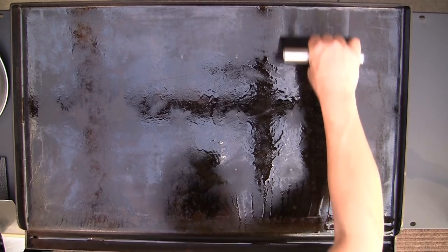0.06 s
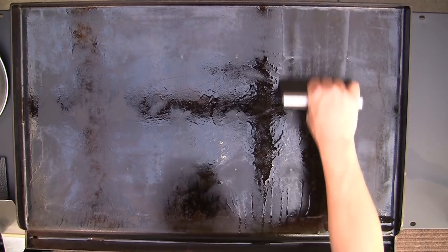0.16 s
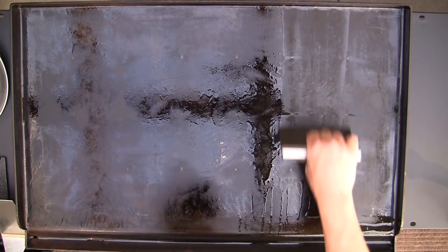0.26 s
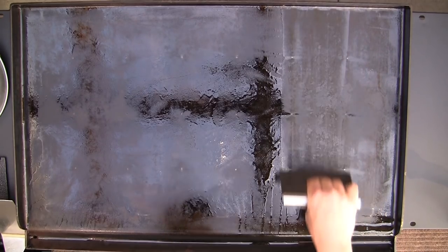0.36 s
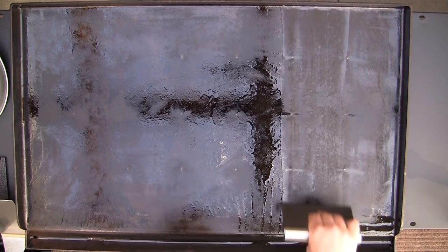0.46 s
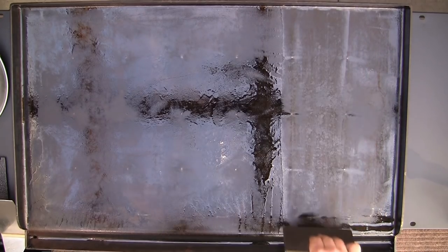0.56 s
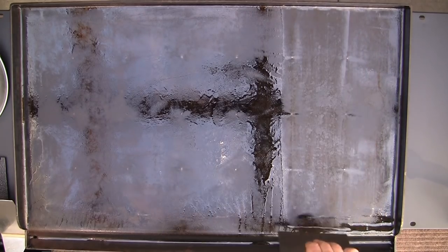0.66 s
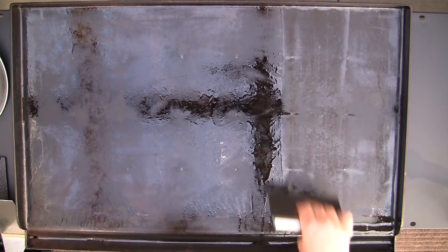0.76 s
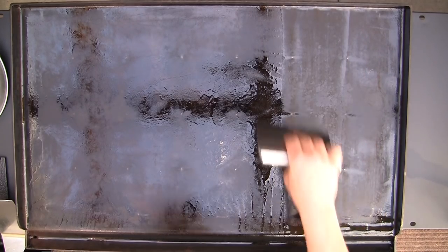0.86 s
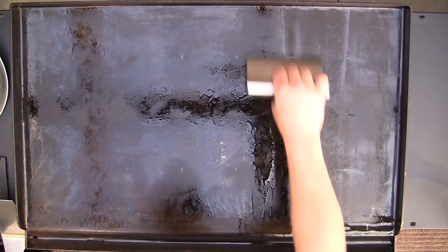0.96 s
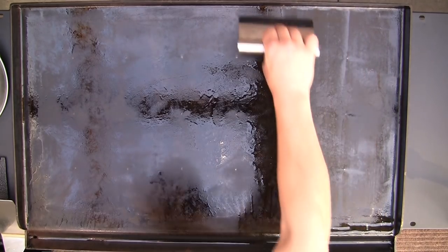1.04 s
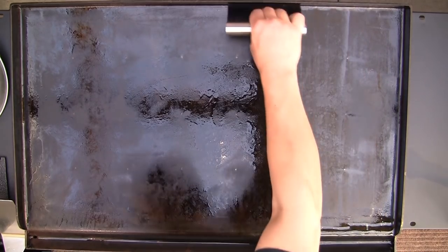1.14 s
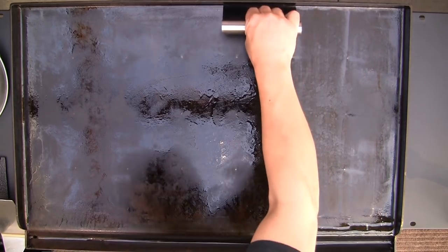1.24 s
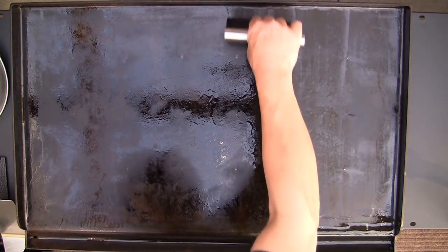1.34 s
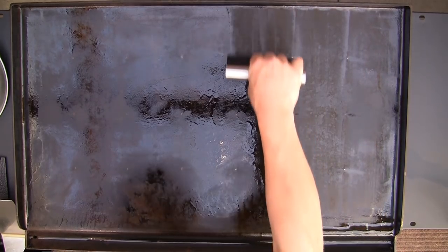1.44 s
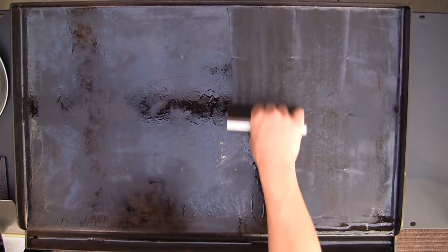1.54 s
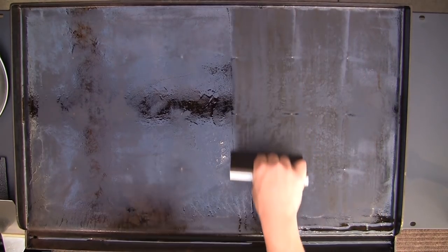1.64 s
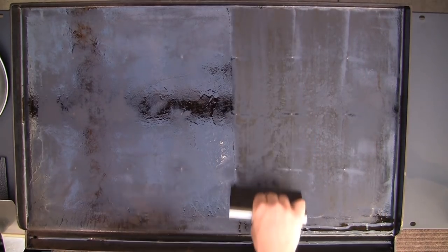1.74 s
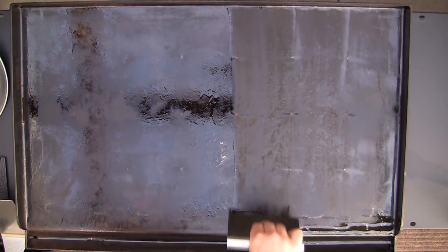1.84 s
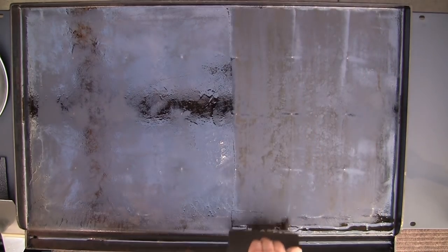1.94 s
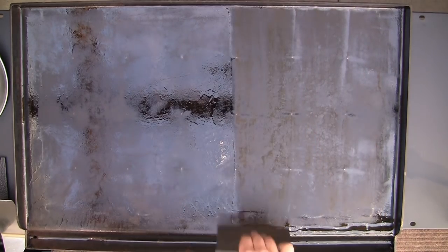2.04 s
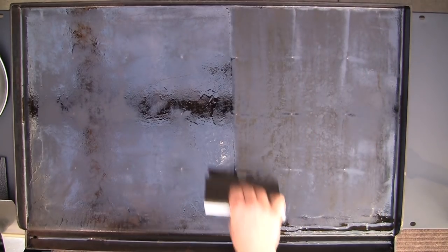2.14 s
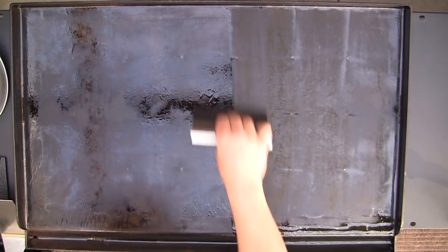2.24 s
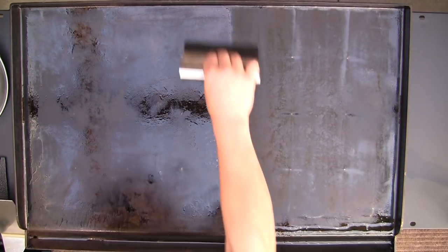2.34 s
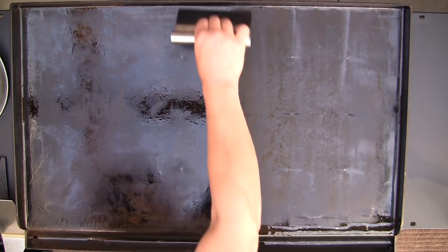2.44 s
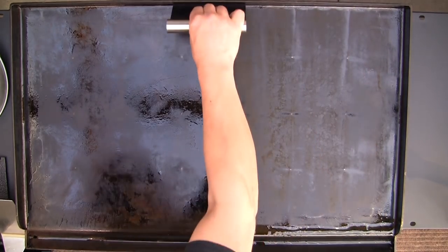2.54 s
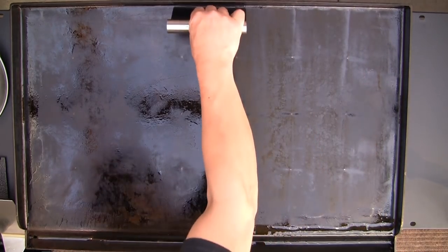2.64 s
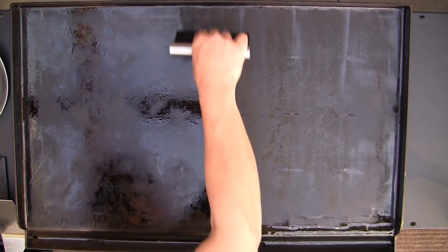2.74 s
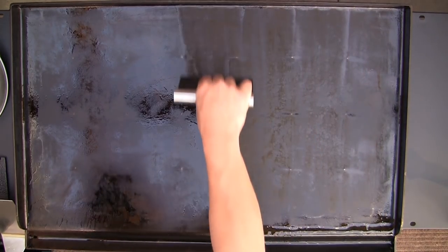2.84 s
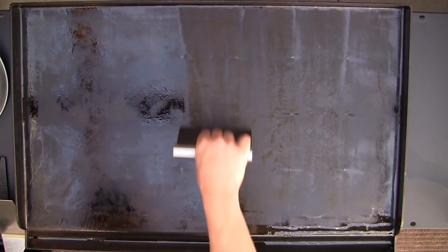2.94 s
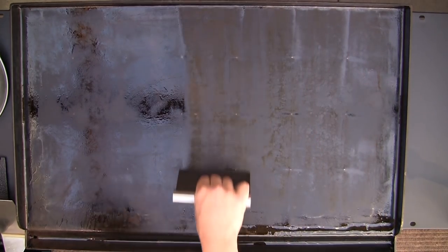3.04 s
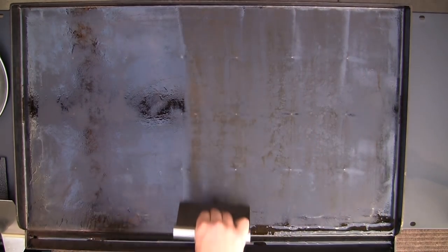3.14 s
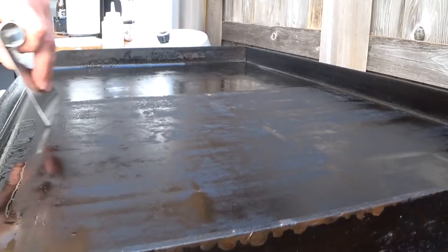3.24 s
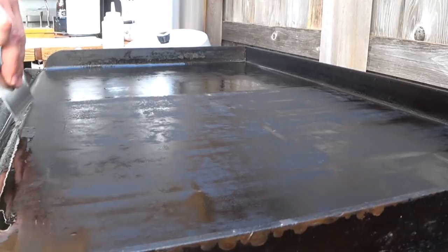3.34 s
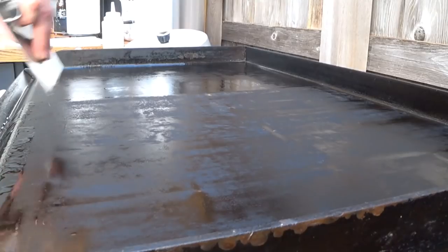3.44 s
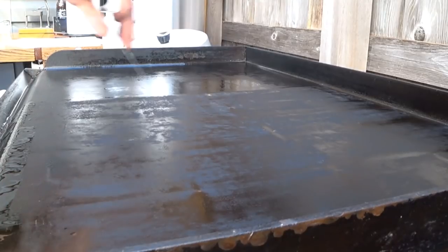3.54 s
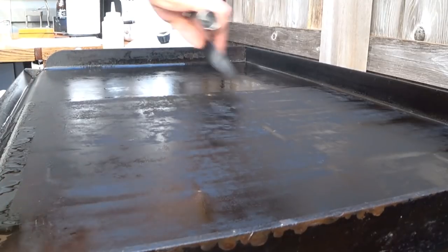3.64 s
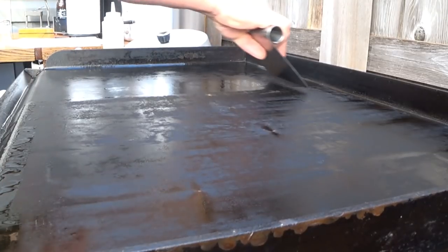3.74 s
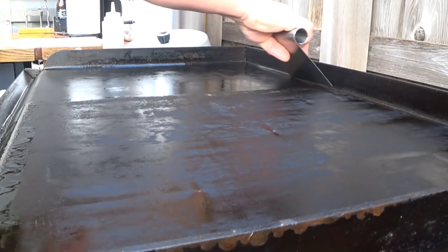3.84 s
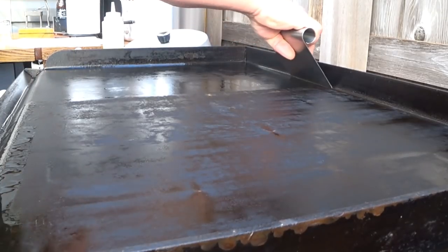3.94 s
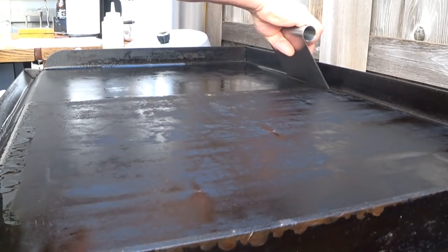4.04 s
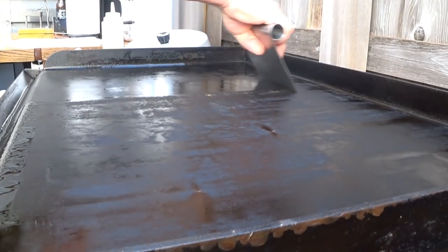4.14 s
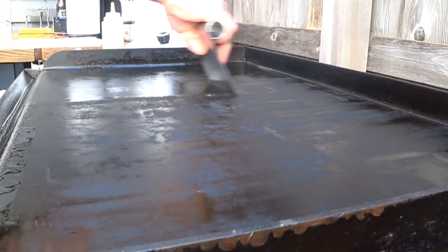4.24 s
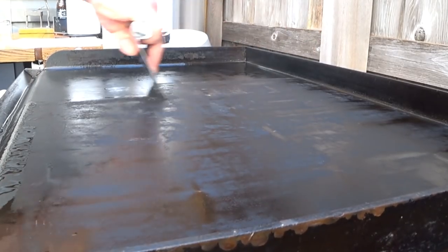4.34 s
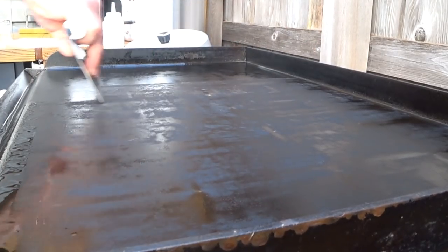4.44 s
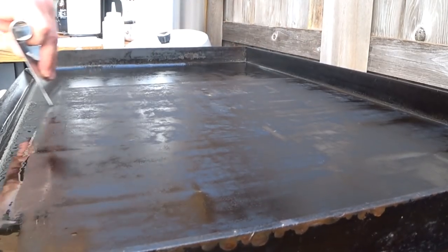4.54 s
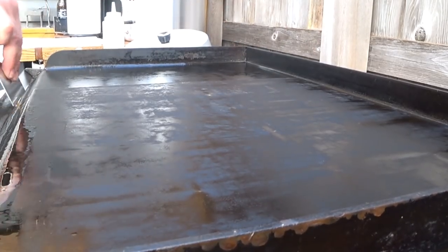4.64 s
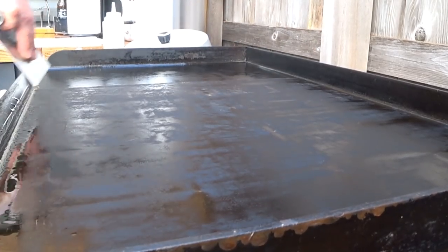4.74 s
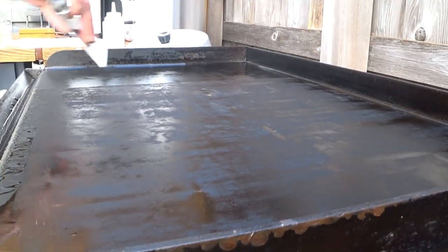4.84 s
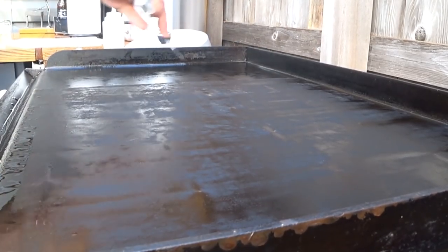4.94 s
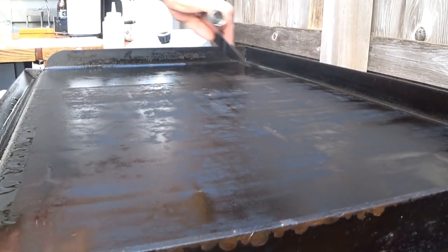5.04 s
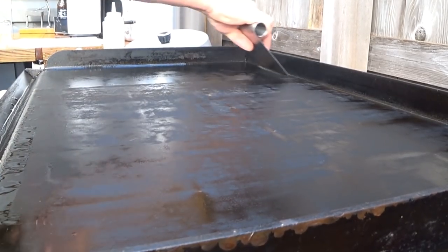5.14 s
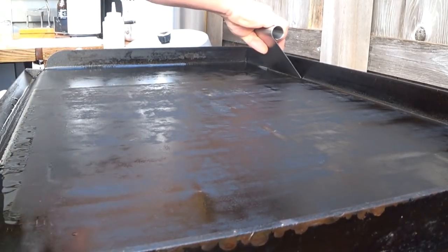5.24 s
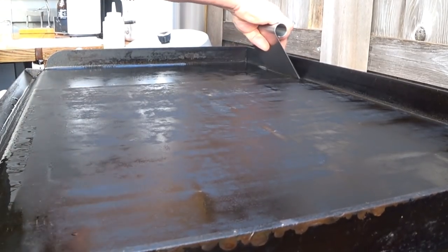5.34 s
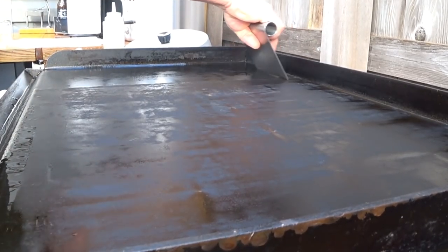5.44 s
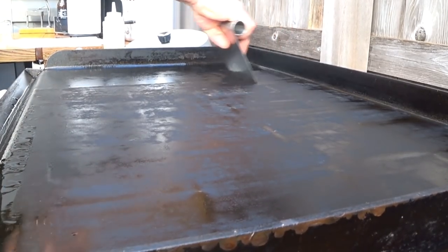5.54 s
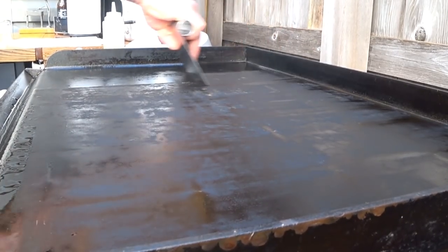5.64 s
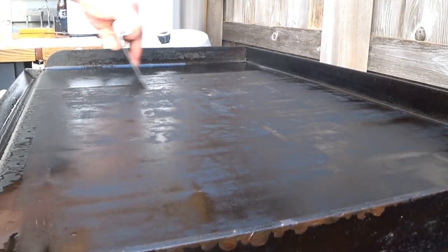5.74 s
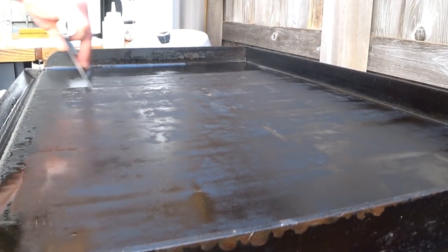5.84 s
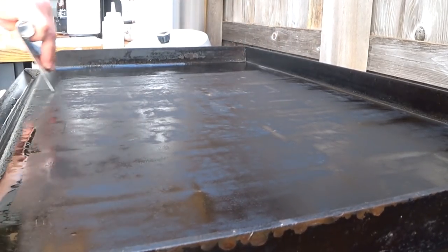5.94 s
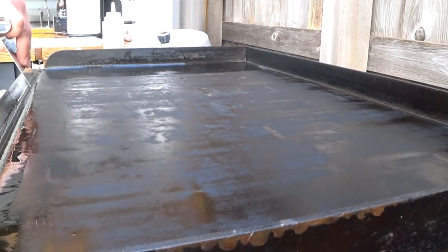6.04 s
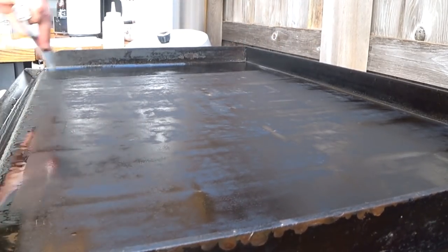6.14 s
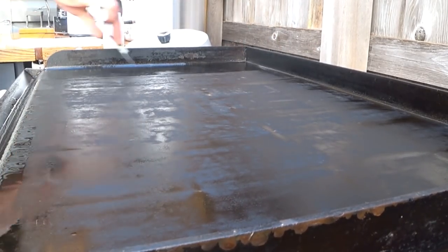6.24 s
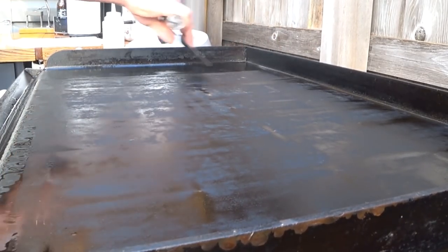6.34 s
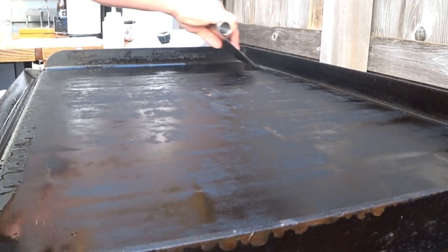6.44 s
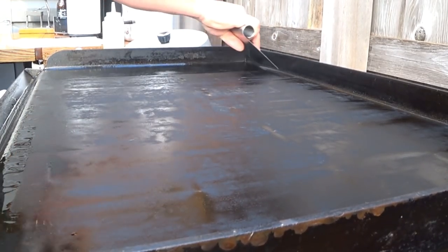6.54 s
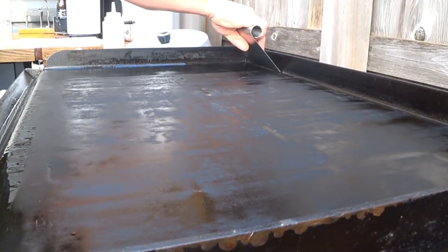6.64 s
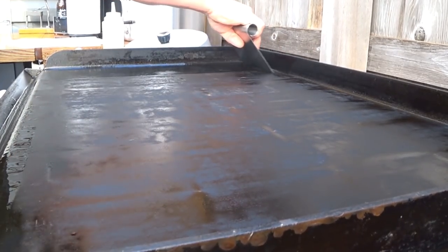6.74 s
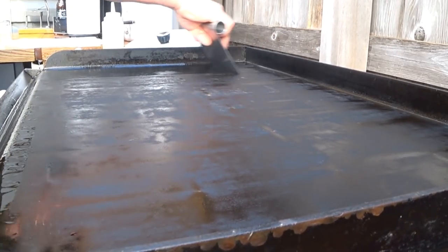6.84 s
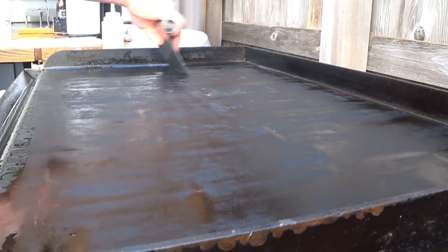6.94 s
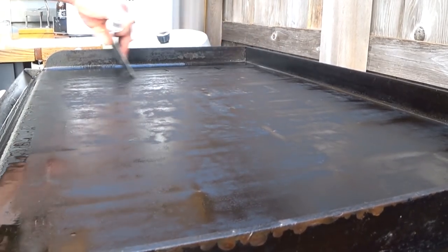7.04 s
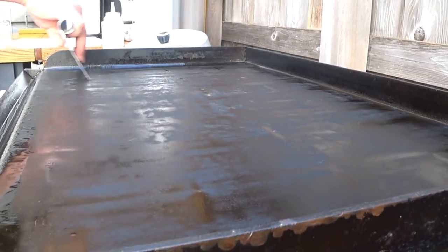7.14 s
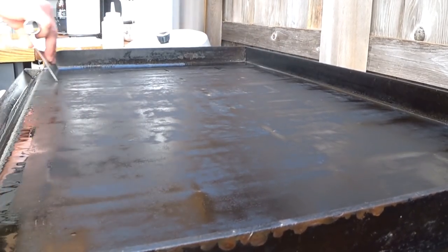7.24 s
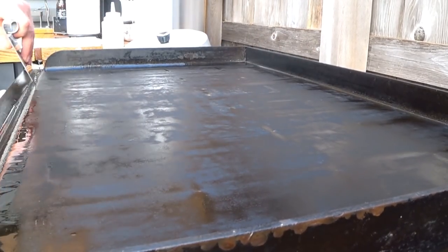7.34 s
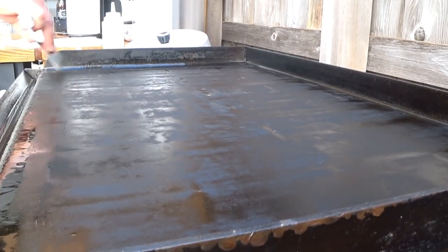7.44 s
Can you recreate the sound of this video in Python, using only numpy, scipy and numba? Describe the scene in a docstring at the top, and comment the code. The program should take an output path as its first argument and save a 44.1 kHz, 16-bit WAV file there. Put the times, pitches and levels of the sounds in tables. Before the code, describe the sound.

Close up, a metal scraper strikes a flat steel cooktop with hard ringing clanks, then pulls along it in gritty, half-second rasps, roughly one every 1.3 seconds. The loudest hits come early; later strokes are somewhat lighter. Each stroke ends with a scuff or tap, then a short pause filled by faint sizzling hiss. Outdoors, dry, slightly right of centre.

```python
"""At an outdoor cooking cart, a steel scraper lands on a hot flat steel cooktop, bounces, drags and taps the rim.
Noise bursts (blows) and gritty noise (drags) drive a bank of ringing plate modes and the blade's own bright rasp.
A changing position under the blade sets how hard each mode is driven; some single modes also swell up clearly.
Shaped noise gives the soft hiss of fat, burners and air, with a thin tone; sine knocks give a few dull bumps.
A gain control briefly turns down the loud blows."""
import sys
import numpy as np
from numba import njit
from scipy import signal
from scipy.fft import rfft, irfft, next_fast_len
from scipy.io import wavfile
from scipy.ndimage import uniform_filter1d, map_coordinates

SR = 44100
rng = np.random.default_rng(int(sys.argv[2]) if len(sys.argv) > 2 else 0)


def dump(signal):
    """Clip the signal to [-1, 1] and save it as 16-bit WAV at the path in sys.argv[1]."""
    limited = np.clip(np.atleast_2d(signal).T, -1, 1)
    pcm = np.round(limited * 32767).astype(np.int16)
    wavfile.write(sys.argv[1], SR, pcm)


N = 330309  # samples, about 7.5 s

# Steady hiss, its colour: (frequency [Hz], level per Hz [dB])
HISS_COLOUR = [(20, -29), (100, -24), (300, -5.5), (600, -3.5), (1500, 5.5), (3400, -7.5), (6500, -10.5),
               (8600, -22), (11000, -21.5), (16000, -34)]
# Blade hitting steel: (time [s], edge level [dB], level of the weight behind it [dB],
#   centre of its body sound [Hz], grit level of the skid that follows [dB])
BLADE_BLOWS = [(.008, -11.5, -3, 1980, -26.5), (0.227, -31, -13, 2900, -46), (0.639, -27, -29, 1150, -30),
               (0.675, -36, -47, 1230, -71), (1.214, -16.5, -30, 3390, -32), (1.2298, -5.5, -6, 1770, -21),
               (1.266, -12, -28, 3670, -28), (1.2719, -2, 3.5, 3830, -8.5), (1.3652, 0.5, 7.5, 1930, -13.5),
               (1.9624, -5.5, -3, 2740, -13), (2.588, -25.5, -19.5, 2240, -34), (2.61, 8, 14, 2900, 1),
               (2.7345, 1, -2, 3530, -32), (3.33, -24, -52, 2000, -25.5), (3.3697, -20, -30, 1310, -28.5),
               (3.918, -45, -32, 1500, -39.5), (3.938, -26, -15.5, 1220, -34),
               (3.9679, -3.5, -4.5, 1270, -34), (4.0726, -17, -12.5, 2590, -64),
               (4.1755, -30, -42, 2050, -58), (4.6326, -23, -24, 2800, -31),
               (4.6818, -9.5, -13.5, 2130, -16.5), (5.2994, -6, -7, 1370, -35),
               (5.3295, -4.5, -3, 2800, -26), (5.425, -7, -7, 3240, -30), (6.02, -38, -45, 2000, -42),
               (6.0828, -22, -22, 2570, -26), (6.6475, -29.5, -19.5, 1500, -38),
               (6.6678, -1, 0.5, 2390, -9), (6.765, -13.5, -10.5, 800, -59), (7.37, -31, -35, 1810, -26),
               (7.39, -22, -26.5, 3820, -26.5)]
# Pulls of the blade along the plate: (start [s], up to speed [s], slowing [s], stop [s],
#   grit creeping off [dB], grit at speed [dB], grit stalling [dB],
#   coarse judder over grit [dB], edge chatter over grit [dB])
DRAG_STROKES = [(0.106, 0.302, 0.53, 0.65, -49, -14.5, -35.5, -13, -16),
                (1.454, 1.655, 1.84, 1.96, -39, -10, -31, -8, -0.5),
                (2.784, 3.022, 3.23, 3.286, -43.5, -15.5, -43.5, 2, 4),
                (4.168, 4.36, 4.46, 4.696, -38.5, -14.5, -42, -3.5, 2.5),
                (5.477, 5.74, 5.9, 6.07, -47.5, -20, -51, 3, 4),
                (6.797, 6.996, 7.14, 7.37, -40.5, -17, -42, -18, 0.5)]
# Clearest ringing modes: the plate's, with the last two (5850, 6780 Hz) rung by the lifted scraper: (frequency
# [Hz])
CLEAR_MODE_HZ = [285, 525, 775, 806, 834, 933, 980, 1068, 1131, 1206, 1255, 1297, 1410, 1432, 1545, 1748,
                 1807, 1851, 1877, 1938, 1977, 2051, 2160, 2202, 2505, 2720, 2879, 2925, 3060, 3222, 5850,
                 6780]
# How each of those modes rings, in the same order: (level [dB], time to fall 60 dB [s])
CLEAR_MODE_RING = [(-16.5, 0.45), (-11, 0.12), (-21, 1.9), (-3, 0.63), (-16.5, 1.25), (-3, 0.32),
                   (-25, 1.64), (-16, 2.5), (-8, 1.4), (-20, 2.47), (-18, 2.8), (-5.5, 0.76), (-21, .8),
                   (0, 0.54), (-16.5, 1.7), (-8, 1.12), (-10, 1.7), (-9, 1.03), (2, 0.75), (-13.5, 0.99),
                   (-9, 1.23), (1, 0.62), (-12, 1.29), (-3, 0.71), (-7, 0.2), (-15, 0.27), (-6.5, 1.09),
                   (16, 0.25), (10, 0.33), (-11, 0.098), (-12, 0.27), (-14, 0.17)]
# The plate's many other modes: (frequency [Hz], level per Hz [dB])
CROWD_LEVEL = [(71, -87), (120, -37.5), (643, -17.5), (911, -9.5), (988, -2), (1400, 0), (1620, -6.5),
               (1860, 2), (2530, -2.5), (2990, -0.5), (4980, -6), (7200, -7.5), (9400, -18.5),
               (10800, -13.5), (16000, -51.5)]
# How long those other modes ring: (frequency [Hz], time to fall 60 dB [s])
CROWD_DECAY = [(200, 0.4), (600, 0.41), (1400, 0.48), (2500, 0.34), (4000, 0.25), (7000, 0.21),
               (11000, 0.16), (16000, 0.17)]
# Resonances of the thin blade: (frequency [Hz], width [Hz], level [dB])
BLADE_MODES = [(4040, 340, 9.5), (5420, 630, 3), (6920, 750, 3.5), (8280, 660, 3), (10690, 1260, 5.5)]
# Single modes that swell up and ring clearly, of the plate or, at 5850 and 6780 Hz, of the lifted scraper:
# (time [s], frequency of the mode, nearest is used [Hz], level [dB])
SINGING_MODES = [(.5, 1131, -18), (1.275, 1877, -1), (1.23, 5850, -10), (1.273, 806, -9),
                 (1.365, 1877, -12.5), (1.962, 2051, -13.5), (1.962, 1851, -21), (1.962, 933, -13),
                 (1.962, 2879, -43), (2.61, 2925, -16), (2.61, 525, -18), (3.371, 1131, -35),
                 (3.968, 1206, -30.5), (4.072, 2925, -19), (4.299, 2879, -9), (4.501, 1877, -6.5),
                 (4.632, 1131, -47), (4.683, 1297, -38), (4.681, 1255, -35.5), (4.681, 1206, -33),
                 (5.33, 806, -25), (5.4256, 2051, -23), (5.699, 2879, -11.5), (6.084, 2505, -18),
                 (6.084, 1131, -33.5), (6.083, 1206, -40.5), (6.083, 980, -38), (6.084, 5850, -24),
                 (6.085, 6780, -28), (6.668, 806, -13.5), (6.95, 2160, -14), (7.049, 2925, -2)]
# Soft dull bumps nearby: (time [s], level [dB], frequency [Hz])
DULL_BUMPS = [(0.892, -38.5, 437), (0.963, -40, 404), (4.841, -28, 412)]

HISS_DB = -45.5
WHINE_HZ, WHINE_DB = 10864, -83  # thin, faint tone; its level wavers around this
# rise times and times to fall 60 dB [s] of a blow's three parts; thud level over the weight [dB]
EDGE_RISE_S, BODY_RISE_S, THUD_RISE_S = 0.00023, 0.0021, 0.0074
EDGE_T60, BODY_T60, THUD_T60, THUD_DB = 0.018, 0.036, .12, 3.5
SKID_RISE_S, SKID_DB_PER_S = 0.0069, 309
SKID_JUDDER_DB, SKID_CHATTER_DB = 1.5, -1.5  # over the skid's grit
RIM_S = .1  # a blow from a drag's slowing until this long after its stop [s] counts as at the rim
RIM_DB_PER_S = 500  # a skid at the rim dies faster: the blade is lifting
LIFT_DB_PER_S = 395  # how fast a drag's sound fades outside its start and stop
TOP_HZ = 15800  # nothing is kept from here up


def amp(db):
    """Turns decibels into a gain."""
    return 10 ** (np.asarray(db) / 20)


def along(points, hz):
    """Reads a curve of (frequency [Hz], value) points on a log frequency axis."""
    f, v = np.transpose(points)
    return np.interp(np.log(hz + 1), np.log(f + 1), v)


def filtered(x, response):
    """Multiplies the spectrum of x by a response, real or complex, at each frequency."""
    m = next_fast_len(N + SR // 2)
    return irfft(rfft(x, m) * response(np.fft.rfftfreq(m, 1 / SR)), m)[..., :N]


def butter(x, hz, kind, order=2):
    """A low-pass, high-pass or band-pass filter that runs forward in time."""
    return signal.sosfilt(signal.butter(order, hz, kind, fs=SR, output="sos"), x)


def wobble(rate):
    """A smooth random curve through `rate` random points a second."""
    return map_coordinates(rng.standard_normal(int(N * rate / SR) + 4), [np.arange(N) * rate / SR])


def hiss():
    """Fat, burners and outdoor air: shaped, wavering noise, partly alike on both sides, with a thin tone."""
    mid, side = filtered(rng.standard_normal((2, N)), lambda hz: amp(along(HISS_COLOUR, hz)))
    air = np.array([mid + .5 * side, mid - .5 * side]) * amp(0.81 * wobble(18))
    whine_phase = 2 * np.pi * WHINE_HZ * np.arange(N) / SR + wobble(40)
    whine = amp(WHINE_DB + 4 * wobble(12)) * np.sin(whine_phase)
    return amp(HISS_DB) * air / mid.std() + whine


def blows():
    """Each hit is a sharp touch of the edge, the edge settling along its length, then the hand's weight."""
    edge, body, thud = np.zeros((3, N))
    u = np.arange(SR // 12) / SR
    for s, edge_db, weight_db, hz, _ in BLADE_BLOWS:
        noise = rng.standard_normal((3, len(u)))
        at = slice(round(s * SR), round(s * SR) + len(u))
        edge[at] += amp(edge_db - 60 * u / EDGE_T60) * (1 - np.exp(-u / EDGE_RISE_S)) * noise[0]
        settle = amp(weight_db - 60 * u / BODY_T60) * (1 - np.exp(-u / BODY_RISE_S)) * noise[1]
        body[at] += butter(settle, [hz / 1.98, hz * 1.5], "band")
        thud_level = amp(weight_db + THUD_DB - 60 * u / THUD_T60)
        thud[at] += thud_level * (1 - np.exp(-u / THUD_RISE_S)) * noise[2]
    # the first touch is too brief to move the plate's lower modes
    return butter(edge, hz=2520, kind="high", order=1), body, thud


def sliding():
    """Strength of grit, judder and chatter: each blow skids a little; drags speed up, hold and slow down."""
    t, out = np.arange(N) / SR, np.zeros((3, N))
    u = np.arange(SR // 2) / SR
    skid_colour = amp([[0], [SKID_JUDDER_DB], [SKID_CHATTER_DB]])
    for s, *_, db in BLADE_BLOWS:
        at_rim = any(slowing < s < stop + RIM_S for _, _, slowing, stop, *_ in DRAG_STROKES)
        fall = RIM_DB_PER_S if at_rim else SKID_DB_PER_S
        skid = amp(db - fall * u) * (1 - np.exp(-u / SKID_RISE_S)) * skid_colour
        at = round(s * SR)
        out[:, at:at + len(u)] += skid[:, :N - at]
    for start, full, slowing, stop, creep_db, db, stall_db, judder_db, chatter_db in DRAG_STROKES:
        grit_db = np.interp(t, [start, full, slowing, stop], [creep_db, db, db, stall_db])
        lifted = np.maximum(np.maximum(start - t, t - stop), 0)  # seconds outside the drag
        out += amp(grit_db - LIFT_DB_PER_S * lifted) * amp([[0], [judder_db], [chatter_db]])
    return out


def contact():
    """Sharp and blunt forces under the edge, and the hand's slower push: blows plus uneven sliding grit."""
    edge, body, thud = blows()
    strengths = sliding()
    uneven = amp(1.37 * wobble(40) + 2.04 * wobble(900))  # patches of crust, single grains
    push = amp(-3.5) * strengths[0] * rng.standard_normal(N)
    grit, judder, chatter = [e * uneven * rng.standard_normal(N) for e in strengths]
    coarse = butter(judder, hz=1600, kind="low")
    rattle = butter(chatter, hz=[2000, 3600], kind="band")
    return grit + edge, coarse + rattle + body, thud + push


@njit(fastmath=True)
def resonate(force, poles, drive, ears):
    """A bank of damped resonators; drive holds how strongly each is pushed in every 128 samples."""
    out = np.zeros((2, len(force)))
    for m in range(len(poles)):
        z = 0j
        for i in range(len(force)):
            z = poles[m] * z + drive[m, i // 128] * force[i]
            out[0, i] += ears[0, m] * z.imag
            out[1, i] += ears[1, m] * z.imag
    return out


def plate(force, push, count=800, speed=1.1):
    """Crowded bending modes ring on; a contact point moving steadily (speed [m/s]) crosses nodes and bellies."""
    hz = (np.arange(count) + 8 + rng.uniform(-0.46, 0.481, count)) * 19.5
    t60 = along(CROWD_DECAY, hz) * np.exp(0.16 * rng.standard_normal(count))
    level_db = along(CROWD_LEVEL, hz) + 0.62 * rng.standard_normal(count)
    gain = amp(level_db) / np.sqrt(t60)  # a longer ring stores more
    clear_db, clear_t60 = np.transpose(CLEAR_MODE_RING)
    hz, t60 = np.r_[hz, CLEAR_MODE_HZ], np.r_[t60, clear_t60]
    gain = np.r_[gain, amp(clear_db)]
    poles = np.exp((2j * np.pi * hz - np.log(1000) / t60) / SR)
    # bending waves per metre along the stroke
    waves = np.sqrt(hz / 1000) / .2 * rng.uniform(.3, 1, len(hz))
    metres = speed * np.arange(N // 128 + 1) * 128 / SR
    position = np.cos(2 * np.pi * (np.outer(waves, metres) + rng.random((len(hz), 1))))
    drive = gain[:, None] * position
    side = 0.37 * rng.choice([-1, 1], len(hz))  # each mode radiates more to one side
    ears = np.array([1 + side, 1 - side])
    low = hz < 950  # a slow push reaches only the low modes
    ring = resonate(force, poles, drive, ears)
    ring += resonate(push, poles[low], drive[low], ears[:, low].copy())
    return amp(-41.5) * butter(ring, hz=130, kind="high", order=3)  # keeps the ring free of deep thumps


def blade_response(f):
    """The thin blade's resonances added up, with every second one turned upside down."""
    total = 0
    for k, (centre, width, db) in enumerate(BLADE_MODES):
        peak = 1j * f * width / (centre * centre - f * f + 1j * f * width)
        total = total + (-1) ** k * amp(db) * peak
    return total


def blade(force):
    """The scraper's short, bright rasp, scattered differently to each side by plate and rim."""
    rasp = amp(6.5) * filtered(force, blade_response)
    u = np.arange(SR // 20) / SR
    scatter = amp(-29.0 - 60 * u / 0.02) * rng.standard_normal((2, len(u)))
    return rasp + signal.fftconvolve(rasp[None], scatter, axes=1)[:, :N]


def cart_rumble(push):
    """The cart shakes under the hand: the push's deep part, uneven at each ear."""
    shaken = push * (1 + 0.44 * np.array([wobble(150), wobble(160)]))
    deep = butter(shaken, hz=130, kind="low")
    return amp(-21) * butter(deep, hz=40, kind="high")


def singing():
    """Single modes of the plate, or of the lifted scraper, swell up, flutter at random and die away at their
    own speed."""
    out, t = np.zeros(N + SR), np.arange(SR) / SR
    for s, mode, db in SINGING_MODES:
        k = np.argmin(np.abs(np.log(np.divide(CLEAR_MODE_HZ, mode))))  # nearest clear mode
        swell = amp(db - 60 * t / CLEAR_MODE_RING[k][1]) * (1 - np.exp(-t / 0.0065))
        flutter = amp(3.0 * wobble(30.1)[:SR])
        tone = np.sin(2 * np.pi * (CLEAR_MODE_HZ[k] * t + rng.random()))
        out[round(s * SR):][:SR] += swell * flutter * tone
    return out[:N]


def bumps():
    """Short low knocks: fading sine tones with a soft start."""
    out, t = np.zeros(N + SR), np.arange(SR // 5) / SR
    for s, db, hz in DULL_BUMPS:
        fade = amp(db - 60 * t / 0.093) * (1 - np.exp(-t / 0.0067))
        out[round(s * SR):][:len(t)] += fade * np.sin(2 * np.pi * hz * t)
    return out[:N]


def scene():
    """Adds all sources; everything but the hiss sits a little to the right."""
    sharp, blunt, push = contact()
    ring = plate(butter(sharp + blunt, hz=507, kind="high", order=3), push)
    rasp = butter(blade(sharp), hz=900, kind="high")
    struck = ring + rasp + cart_rumble(push) + singing() + bumps()
    return struck * amp([[-.7], [.7]]) + hiss()


@njit
def follow(x, attack, release):
    """A level follower that rises fast and falls slowly."""
    out, level = np.zeros(len(x)), 0.
    for i in range(len(x)):
        level += (attack if x[i] > level else release) * (x[i] - level)
        out[i] = level
    return out


def record(dry, ahead=64):
    """Gain control, looking `ahead` samples forward, turns down loud moments; then the top is cut off."""
    loudest = np.abs(dry).max(0)
    early = np.pad(loudest[int(ahead):], (0, int(ahead)))
    level = follow(early, 1 / (0.00034 * SR), 1 / (.065 * SR))  # rise and fall times in seconds
    over = np.maximum(level / amp(-10.5), 1)  # how far the level passes the knee
    gain = uniform_filter1d(over ** -.9, size=64)
    return filtered(dry * gain, lambda hz: hz < TOP_HZ)


dry = scene()
out = record(dry)
dump(out)
```